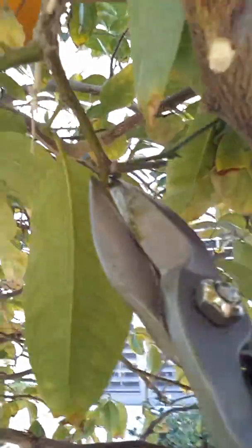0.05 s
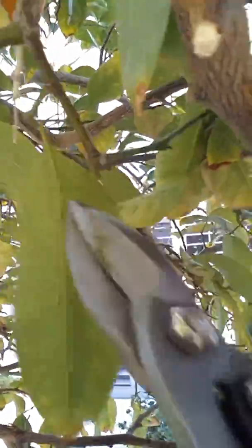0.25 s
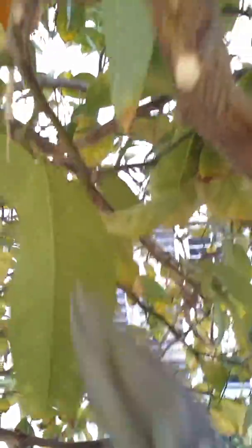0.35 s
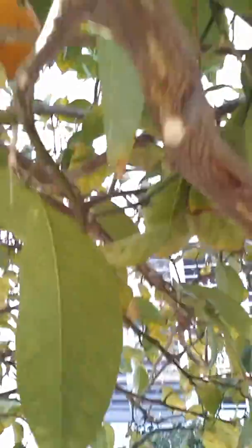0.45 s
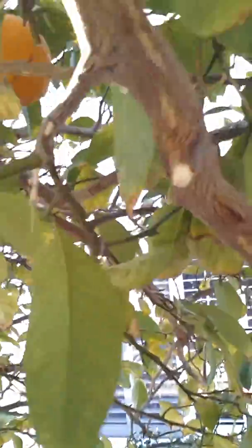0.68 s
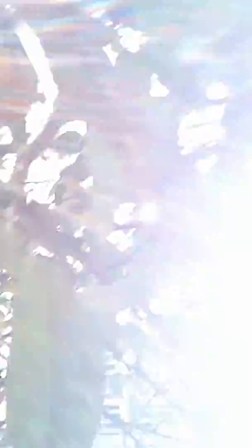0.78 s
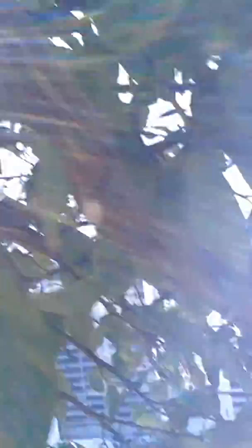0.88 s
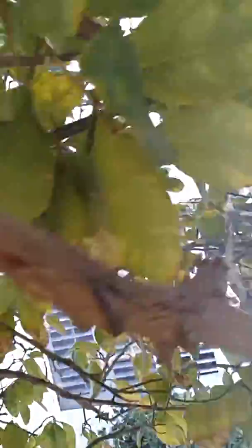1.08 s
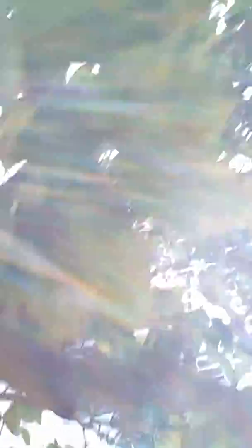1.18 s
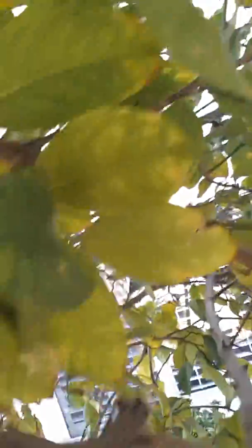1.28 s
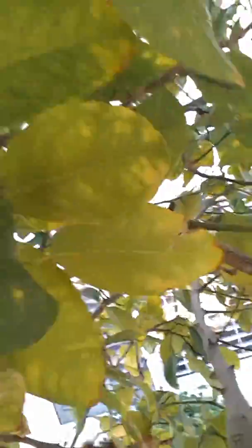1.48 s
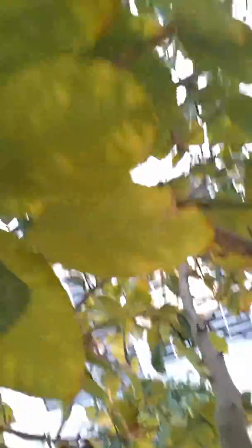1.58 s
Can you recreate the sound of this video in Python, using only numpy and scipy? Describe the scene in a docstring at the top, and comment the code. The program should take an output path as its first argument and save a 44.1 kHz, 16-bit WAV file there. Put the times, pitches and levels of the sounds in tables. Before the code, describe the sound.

Pruning shears cut a twig close by with one sharp, woody crack and steel clack. The blades scrape softly open, the cut piece lands with a light clatter, and leaves rustle faintly in quiet outdoor air.

```python
"""Pruning shears cutting a twig

Close by, the blades tick and scrape, wood fibres fracture in a quick run of cracks, and the steel
rings as it shuts. Stick-slip friction hisses and groans as the shears open. The cut piece lands and
bounces, its modes excited by impact, and leaves brush past. House walls return a short echo, over
quiet outdoor air and the rumble of a hand on the microphone."""
import sys
import numpy as np
from scipy import signal
from scipy.fft import rfft, irfft
from scipy.io import wavfile

SR = 44100
rng = np.random.default_rng(int(sys.argv[2]) if len(sys.argv) > 2 else 0)


def persist_wave(psi):
    """Save psi, clipped to +-1, as 16-bit WAV."""
    counts = np.round(np.clip(psi, -1, 1) * 32767).astype(np.int16)
    wavfile.write(sys.argv[1], SR, np.atleast_2d(counts).T)


N = 72765

# spectra of the outdoor air and the hand's rumble (f/Hz, level/dB)
AIR_SPECTRUM = [(18, -39), (30, -16.5), (92, 1), (171, -9.5), (328, -1.5), (524, -10.5), (837, -10.5),
                (2030, -28), (13200, -28), (15000, -43)]
RUMBLE_SPECTRUM = [(20, -34), (42, -17), (65, -4.5), (95, -4.5), (140, -2.5), (260, -6), (400, -10.5),
                   (700, -17), (1500, -27), (4000, -42.5)]
# envelope of the rumble (t/s, level/dB)
RUMBLE_ENVELOPE = [(0, -55), (.04, -55.5), (.1, -50.5), (.25, -43), (.33, -52), (.47, -46), (.54, -57),
                   (.7, -53), (.77, -45), (.83, -53.5), (.88, -52), (.936, -57), (.968, -47),
                   (1.098, -51.5), (1.148, -63.5), (1.29, -69), (1.312, -52), (1.37, -69.5), (1.44, -60),
                   (1.5, -52), (1.65, -54.5)]
# contacts of blade and pivot (t/s, level/dB, decay/s)
TICKS = [(.066, -7, 0.012), (.0755, -21, .0015), (.0808, -9, 0.003), (.129, -11, 0.009),
         (0.1507, 0.5, 0.0041), (.2222, 9, 0.0064), (.2445, 8.5, 0.0028), (.2605, 3, 0.006),
         (.2895, 0.5, 0.006), (.310, -4, 0.009), (.423, -17, .001), (.631, -7, 0.011)]
# blades rubbing (t/s, length/s, level/dB, ringing re hiss/dB)
SCRAPES = [(0.163, 0.08, -44, -19), (0.404, 0.019, -47, -5), (0.42, 0.019, -45, -5.5),
           (0.442, .016, -47.5, -0.5), (0.456, 0.015, -40.5, -5), (0.474, 0.012, -52.5, 1.5)]
# fibres snapping (t/s, level/dB, decay/s)
CRACKS = [(.2030, -3, .0005), (.2080, 0, .0009), (0.2122, 4, 0.00038), (.2144, -4.5, .0014)]
# spectra of steel contact and wood fracture (f/Hz, level/dB)
STEEL_SPECTRUM = [(300, -31.5), (650, -10.5), (1000, -7), (2400, -9), (4000, -4), (5500, -2), (6700, 5),
                  (8200, -13), (11000, -13.5), (15000, -17.5)]
WOOD_SPECTRUM = [(100, -27), (200, -18.5), (290, -3), (450, -4), (650, -22), (930, 0.5), (1250, -13.5),
                 (1650, -5), (2000, -8), (2800, -2), (4300, -7), (5200, 2.5), (7000, 1), (8500, -8.5),
                 (11000, -11.5), (15000, -19.5)]
# modes of the shears and the cut piece (f/Hz, level/dB, T60/s)
SHEAR_MODES = [(860, -8, .035), (945, -2, .035), (1480, -5, .03), (1700, -11, .015), (2282, 2, .032),
               (2480, -10, .02), (3070, -11, .035), (3280, -5, .035), (3485, -3, .04), (3680, -11, .035),
               (4115, -12, .035), (5190, -5, .02), (5495, -7, .035), (6750, -10, .02)]
TWIG_MODES = [(1063, -6, 0.068), (1901, -12.5, 0.14), (3220, -12, 0.13), (3785, 6.5, 0.077),
              (4583, -12.5, 0.068), (5230, 10.5, .1), (5950, 7, .12), (6286, 7, 0.21), (6070, -16.5, .1),
              (6980, -5, 0.066), (7740, -14, 0.1014), (8670, 0, .13), (9610, -27.5, .09),
              (10800, -14, 0.19), (12020, -9, .11), (13440, -21, .1), (13800, -10.5, 0.089),
              (14340, -22.5, 0.11)]
# envelope of leaves brushing (t/s, level/dB)
RUSTLE_ENVELOPE = [(0, -72), (.5, -59), (.58, -69), (.69, -67), (.72, -58.5), (.88, -55), (.95, -66),
                   (1.1, -63), (1.17, -80), (1.445, -78), (1.465, -56.5), (1.49, -53.5), (1.535, -52.5),
                   (1.56, -48), (1.59, -50), (1.65, -49.5)]
# single leaves flicking (t/s, level/dB, decay/s)
FLICKS = [(1.243, -15.5, .003), (1.453, -9.5, 0.0022), (1.4737, 3, 0.0048), (1.5522, 1, 0.0013),
          (1.57, -1, 0.0018), (1.605, -2, 0.0022)]
# spectrum of the leaves (f/Hz, level/dB)
LEAF_SPECTRUM = [(200, -12.5), (500, -5), (1000, -7.5), (2500, -5.5), (3200, -7), (5200, 0), (7000, -3),
                 (9000, -11.5), (14500, -17)]
# impacts of the cut piece (t/s, level/dB, rise/s, decay/s, hardness/dB)
LANDINGS = [(0.7255, 3, 0.0042, 0.0066, 0), (.777, -20, 0.0011, 0.01, -3),
            (.923, -31.5, .004, 0.0023, -3.5), (0.9648, -11.5, .013, 0.004, -17.5),
            (1.040, -30, 0.002, 0.0095, 0.5), (1.064, -26.5, 0.0015, 0.0099, -0.5),
            (1.118, -39, .004, .012, -1)]
# spectra of hard and soft ground impacts (f/Hz, level/dB)
HARD_SPECTRUM = [(200, -25.5), (700, -21.5), (1100, -11.5), (1900, -8.5), (2600, -14.5), (3400, -5),
                 (4400, -9.5), (5400, 3), (7300, 1), (9500, -8.5), (14500, -15)]
SOFT_SPECTRUM = [(200, -16.5), (700, -17), (1900, -6), (2600, -13), (3300, -1), (3700, -5.5), (4200, 8),
                 (4600, -9.5), (5100, 3), (5900, -1.5), (6900, 0.5), (9000, -16), (14500, -21.5)]
# reverberation between the walls (f/Hz, T60/s, level/dB)
ECHO_BANDS = [(350, 1, -21), (1010, .4, -18.5), (2400, 0.19, -12), (5500, 0.24, -14), (12200, 0.13, -7.5)]
# balance of the shears and of the farther sounds (f/Hz, left minus right/dB)
NEAR_PAN = [(300, 16), (900, 6.5), (1500, 11), (2400, 6), (3800, -1.5), (5100, 9), (6000, -8.5),
            (7000, -13.5), (8500, -8), (12000, 0.5)]
FAR_PAN = [(300, -2), (1200, 4), (4000, 7), (5500, 1.5), (7200, -7.5), (9000, -1), (14000, 0)]

LEFT_RIGHT = np.array([[.5], [-.5]])
TIME = np.arange(N) / SR


def amp(db):
    """Decibels to amplitude ratio."""
    return 10 ** (np.asarray(db) / 20)


def unit(x):
    """Normalisation to unit mean energy per channel."""
    return x / np.sqrt(np.mean(np.sum(x ** 2, axis=-1)) + 1e-18)


def curve(points):
    """Gain interpolated in decibels between (t/s, level/dB) points."""
    return amp(np.interp(TIME, *np.array(points).T))


def on_bins(points):
    """Log-frequency interpolation of (f/Hz, value) points onto the FFT bins."""
    hz, value = np.array(points, float).T
    return np.interp(np.log(np.arange(N + 1) * SR / (2 * N) + 1), np.log(hz), value)


def convolve(x, response):
    """A linear system's output is its input convolved with its impulse response."""
    return irfft(rfft(x, 2 * N) * rfft(response, 2 * N))[..., :N]


def colour(x, spectrum):
    """Minimum-phase filtering that conserves the power of white noise."""
    cepstrum = irfft(np.log(amp(on_bins(spectrum))))
    cepstrum[1:N] *= 2
    cepstrum[N:] = 0
    response = irfft(np.exp(rfft(cepstrum)))[:N]
    return convolve(x, unit(response))


def place(x, pan, left_lead_s=0):
    """Direction is heard from level and time differences between the channels."""
    gains = amp(LEFT_RIGHT * on_bins(pan))
    gains /= np.sqrt(np.mean(gains ** 2, axis=0))
    delay = np.exp(1j * np.pi * LEFT_RIGHT * left_lead_s * SR * np.arange(N + 1) / N)
    return irfft(rfft(x, 2 * N) * delay * gains)[..., :N]


def noise(side=1):
    """Stereo white noise; at side=1 the channels are uncorrelated, as in a diffuse field."""
    m, s = rng.standard_normal((2, N))
    return np.array([m + side * s, m - side * s]) / np.sqrt(1 + side ** 2)


def grains(spread, size=24):
    """Crackle: tiny noise packets of log-normal strength."""
    strength = np.exp(spread * rng.standard_normal(N // size + 1))
    return unit(noise() * np.repeat(strength, size)[:N]) * np.sqrt(N)


def impulse(start):
    """An ideal blow excites all frequencies equally."""
    return 1. * (np.arange(N) == int(start * SR))


def burst(start, decay, rise=1e-4):
    """Transient envelope of unit energy: linear rise, exponential decay."""
    first, envelope = int(start * SR), np.zeros(N)
    age = np.arange(min(N - first, int((rise + 10 * decay) * SR))) / SR
    shape = np.minimum(age / rise, 1) * np.exp(-np.maximum(age - rise, 0) / decay)
    envelope[first:first + len(age)] = unit(shape)
    return envelope


def held(start, end, rise=.003, release=.0045):
    """Sustained envelope with an exponential release."""
    return np.clip((TIME - start) / rise, 0, 1) * np.exp(-np.maximum(TIME - end, 0) / release)


def ring(modes):
    """Modal superposition: damped sinusoids, neighbours in opposite phase."""
    t, response = np.arange(SR // 5) / SR, 0
    for k, (hz, db, t60) in enumerate(modes):
        mode = np.sin(2 * np.pi * hz * t) * np.exp(-np.log(1000) * t / t60)
        response += (-1) ** k * amp(db) * unit(mode)
    return unit(response)


def disperse(x, bass_lag_s=.0006):
    """Dispersion of bending waves in steel: treble outruns bass, so a blow becomes a falling chirp."""
    nyquist_share = np.arange(N + 1) / N
    phase = np.pi * SR * bass_lag_s * (1 - (1 - nyquist_share) ** 3) / 3
    return irfft(rfft(x, 2 * N) * np.exp(-1j * phase))[..., :N]


def outdoor_air():
    """Ambient noise: steady, and strongest in the bass."""
    return amp(-63) * colour(noise(side=.5), AIR_SPECTRUM)


def hand_rumble():
    """Structure-borne sound passes from the hand to the microphone."""
    return colour(noise(side=.35), RUMBLE_SPECTRUM) * curve(RUMBLE_ENVELOPE)


def blade_ticks():
    """Brief contacts of steel radiate broadband bursts."""
    contacts = sum(amp(db) * burst(start, decay) for start, db, decay in TICKS)
    return amp(-13.5) * colour(noise() * contacts, STEEL_SPECTRUM)


def wall_echo(x, delay_s=.023, rise_s=.005):
    """Diffuse reflection from the walls: each band has its own reverberation time."""
    centres_hz = [row[0] for row in ECHO_BANDS]
    spectrum, tail = rfft(noise(), 2 * N), 0
    swell = np.clip((TIME - delay_s) / rise_s, 0, 1)
    for weights, (_, t60, db) in zip(np.eye(len(ECHO_BANDS)), ECHO_BANDS):
        band = irfft(spectrum * on_bins(list(zip(centres_hz, weights))))[:, :N]
        tail += amp(db) * band * unit(swell * np.exp(-np.log(1000) * TIME / t60))
    return convolve(x, tail)


def blade_scrapes(groan_hz=905, groan_t60=.03):
    """Stick-slip of blade on anvil hisses and drives the modes; the pivot groans on opening."""
    friction = grains(spread=.38)
    hiss = colour(friction, STEEL_SPECTRUM)
    ringing = convolve(friction[0], ring(SHEAR_MODES))
    rub = sum(amp(db) * held(start, start + length) * (hiss + amp(ring_db) * ringing)
              for start, length, db, ring_db in SCRAPES)
    groan = convolve(friction[1], ring([(groan_hz, 0, groan_t60)]))
    return rub + amp(-48.5) * held(.408, .475) * groan


def wood_fracture():
    """Fracture: each fibre bundle gives way with a jolt and splinters, with tearing in between."""
    first_crack = CRACKS[0][0]
    jolts = disperse(sum(amp(db) * impulse(start) for start, db, _ in CRACKS))
    splinters = sum(amp(db) * burst(start, decay) for start, db, decay in CRACKS)
    tearing = burst(first_crack - .002, decay=.005, rise=.013) * (TIME > first_crack)
    crackle = noise(side=.64) * np.hypot(splinters, tearing)  # incoherent sources add in power
    return amp(5.5) * colour(amp(-4.5) * jolts + amp(-1.5) * crackle, WOOD_SPECTRUM)


def shears_clack(shut_s=.2128):
    """Impulse excitation: the cracks ring the shears, and the blades shutting ring them hardest."""
    shakes = amp(-8) * sum(amp(db) * impulse(start) for start, db, _ in CRACKS)
    return convolve(disperse(shakes + amp(9) * impulse(shut_s)), ring(SHEAR_MODES))


def leaf_rustle(knock_s=1.035, knock_hz=2320, knock_t60=.01, pan_db=6.5):
    """Friction of leaves on the left, smeared by scattering in the foliage; one branch taps another."""
    flicks = sum(amp(db) * burst(start, decay) for start, db, decay in FLICKS)
    friction = grains(spread=.42) * (curve(RUSTLE_ENVELOPE) + amp(-25) * flicks)
    scattering = unit(impulse(0) + noise() * burst(0, decay=.0029))
    rustle = colour(convolve(friction, scattering), LEAF_SPECTRUM)
    knock = convolve(impulse(knock_s), ring([(knock_hz, 0, knock_t60)]))
    return (rustle + amp(-28.5) * knock) * amp(LEFT_RIGHT * pan_db)


def twig_landings(touch_to_blow_s=.0024):
    """Impact on the ground: a hard blow is bright and excites the twig's modes, a soft one is duller."""
    hard, soft, blows = 0, 0, 0
    for start, db, rise, decay, hardness_db in LANDINGS:
        hardness = min(amp(hardness_db), 1)
        contact = amp(db) * burst(start, decay, rise)
        hard += hardness * contact
        soft += np.sqrt(1 - hardness ** 2) * contact
        blows += hardness * amp(db) * impulse(start + touch_to_blow_s)
    clatter = colour(grains(spread=.086) * hard, HARD_SPECTRUM)
    bounce = colour(grains(spread=.38) * soft, SOFT_SPECTRUM)
    ringing = amp(-12.5) * convolve(blows, ring(TWIG_MODES))
    return amp(5.5) * (clatter + bounce + ringing)


def scene():
    """Superposition of direct sound, reflections and background."""
    snip = wood_fracture() + blade_ticks()
    steel = shears_clack() + blade_scrapes()
    twig = twig_landings()
    early_reflections = amp(-2.5) * convolve(twig, noise() * burst(.0053, decay=.01))
    echo = wall_echo(snip + amp(-7.5) * steel + twig)
    near = place(snip + steel, NEAR_PAN, left_lead_s=.00005)
    far = place(twig + early_reflections + echo, FAR_PAN)
    return near + far + leaf_rustle() + hand_rumble() + outdoor_air()


def record(dry):
    """Soft saturation rounds the loudest peaks; a low-pass filter removes the highest treble."""
    ceiling, cutoff_hz = .9, 14550
    lowpass = signal.ellip(10, .2, 80, cutoff_hz, fs=SR, output="sos")
    return signal.sosfilt(lowpass, ceiling * np.tanh(dry / ceiling))


dry = scene()
out = record(dry)
persist_wave(out)
```